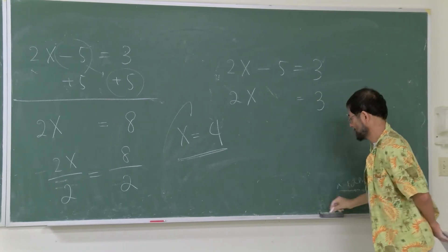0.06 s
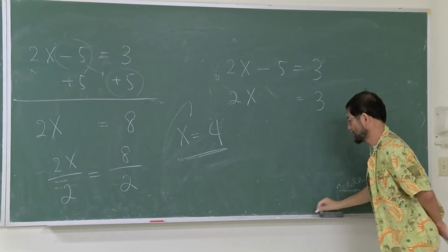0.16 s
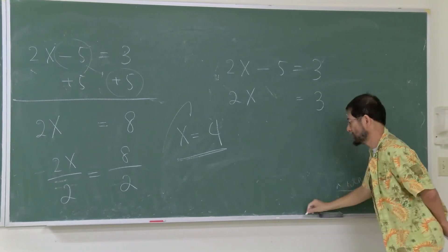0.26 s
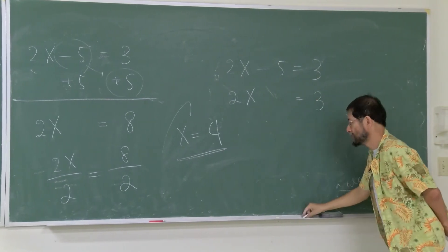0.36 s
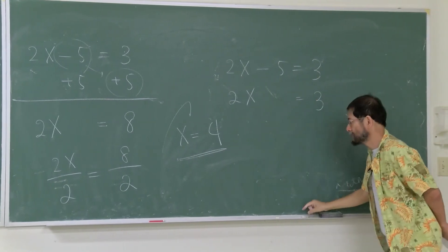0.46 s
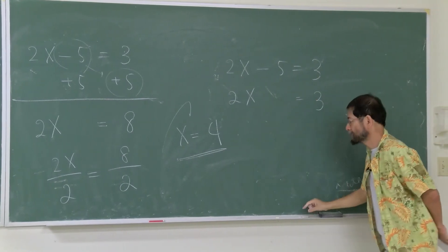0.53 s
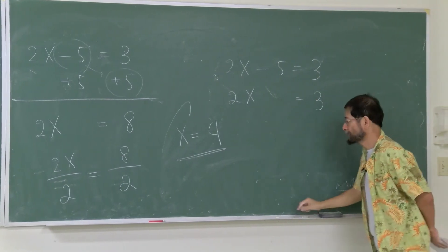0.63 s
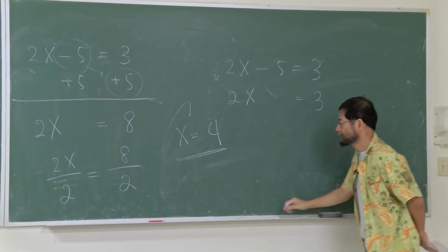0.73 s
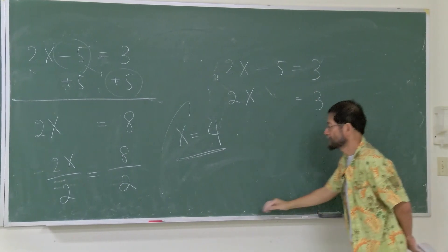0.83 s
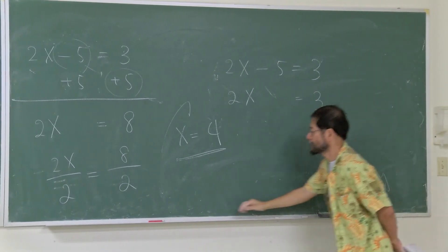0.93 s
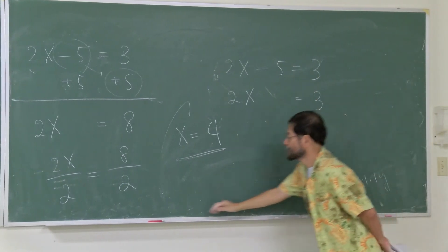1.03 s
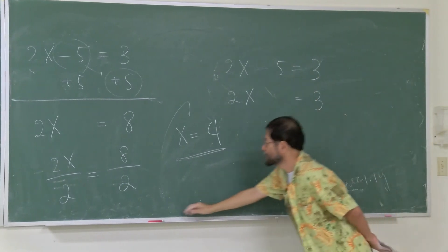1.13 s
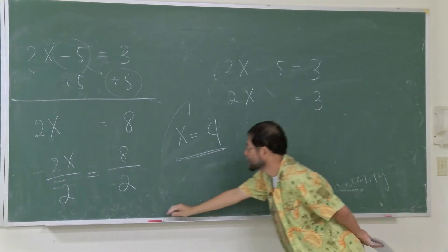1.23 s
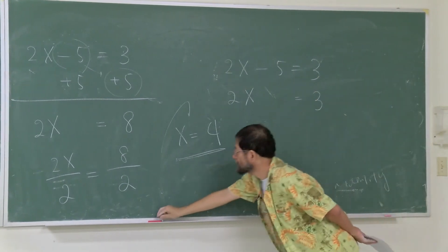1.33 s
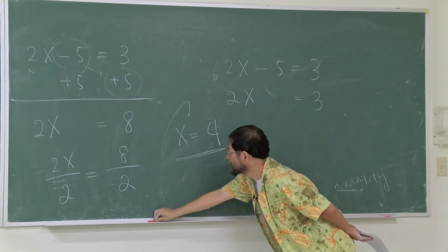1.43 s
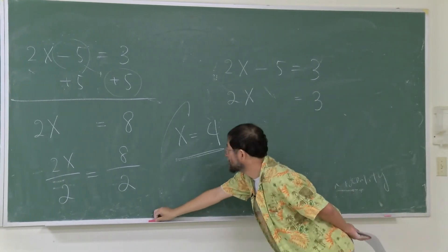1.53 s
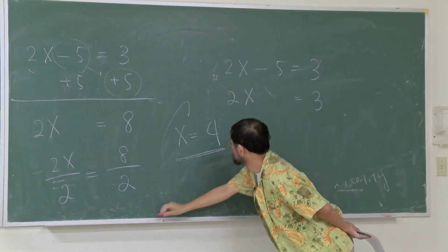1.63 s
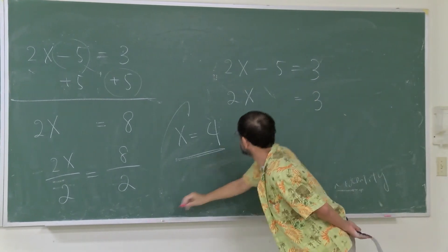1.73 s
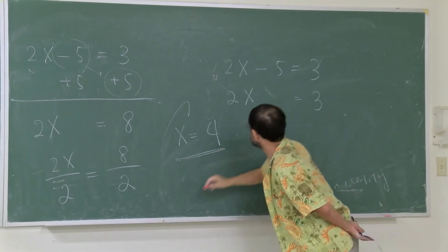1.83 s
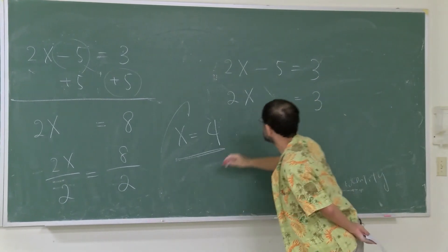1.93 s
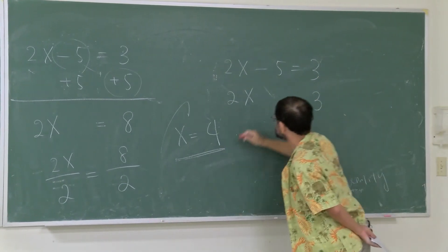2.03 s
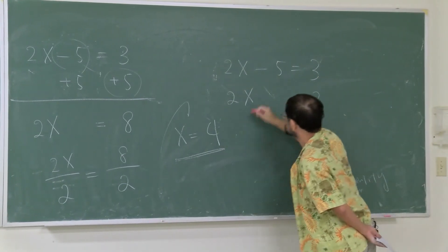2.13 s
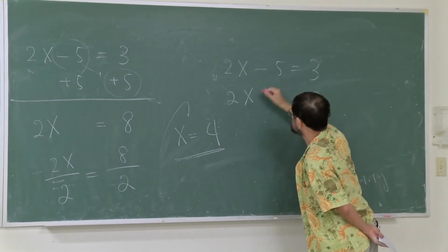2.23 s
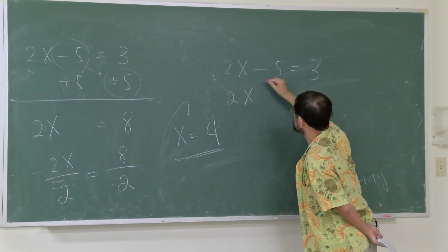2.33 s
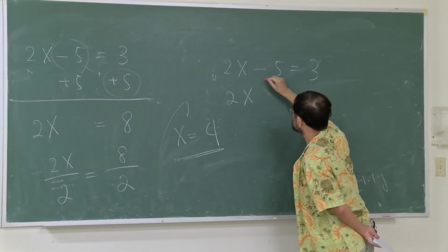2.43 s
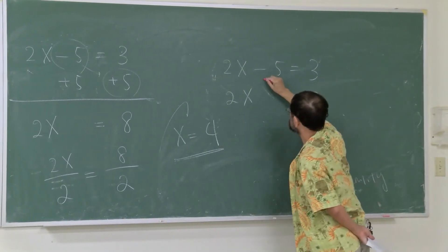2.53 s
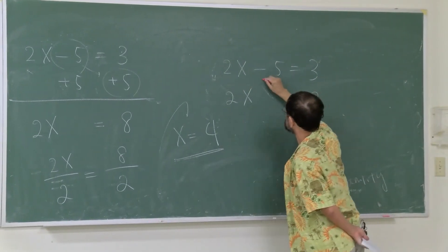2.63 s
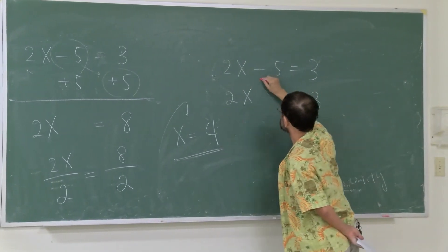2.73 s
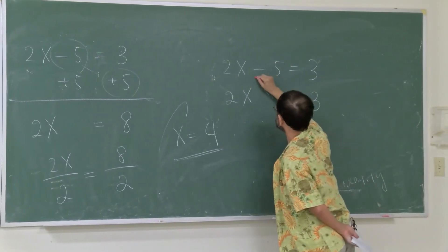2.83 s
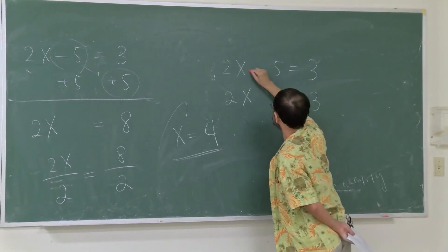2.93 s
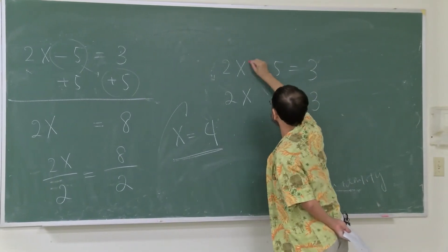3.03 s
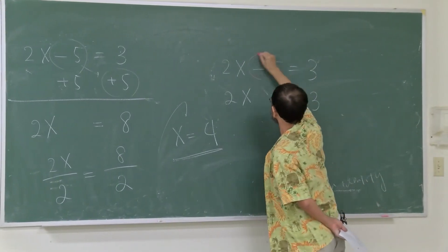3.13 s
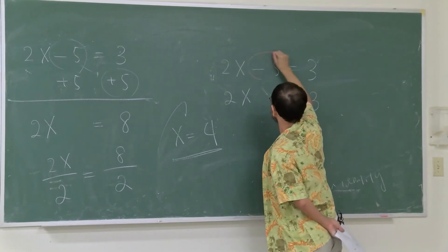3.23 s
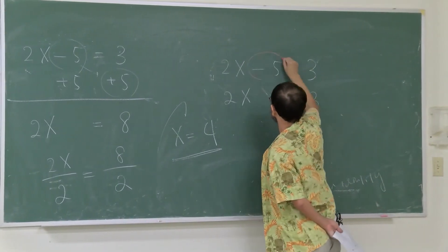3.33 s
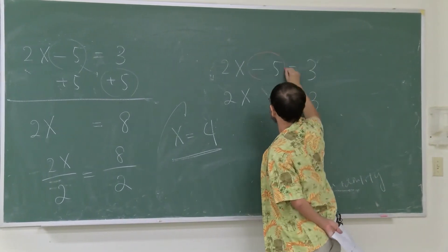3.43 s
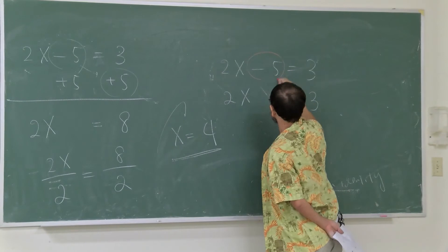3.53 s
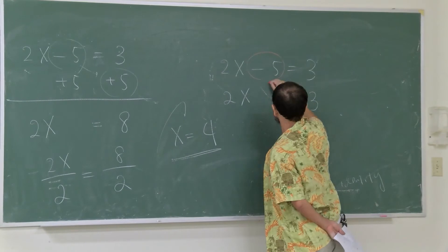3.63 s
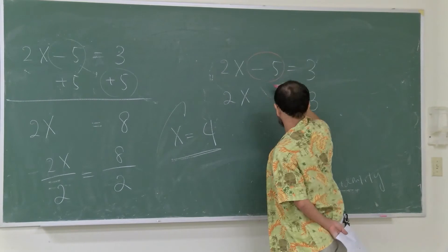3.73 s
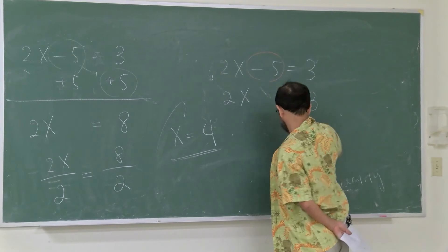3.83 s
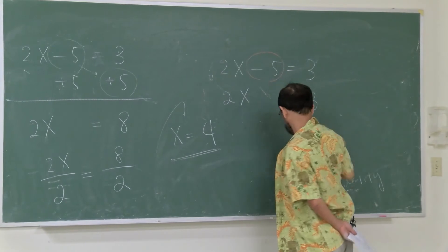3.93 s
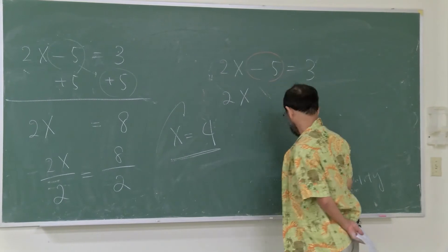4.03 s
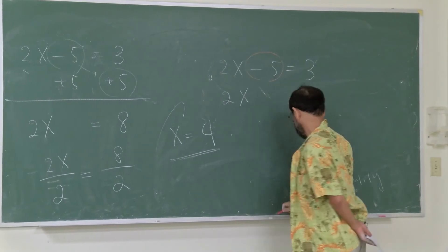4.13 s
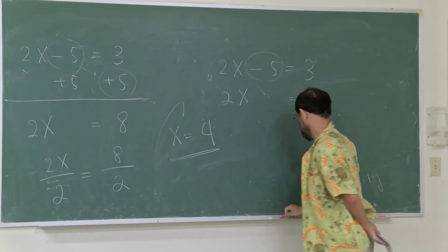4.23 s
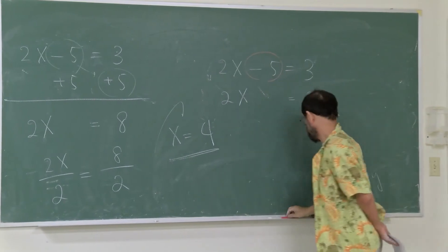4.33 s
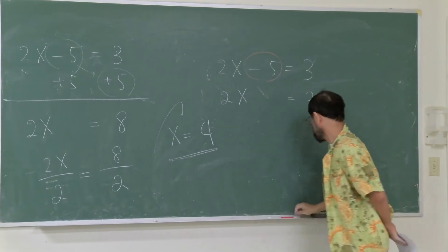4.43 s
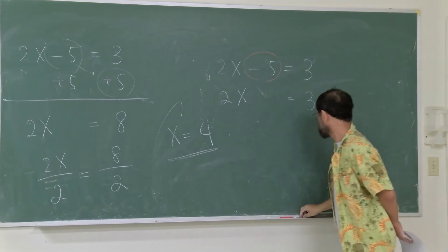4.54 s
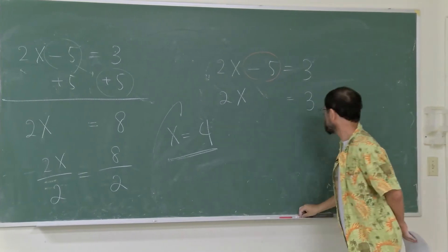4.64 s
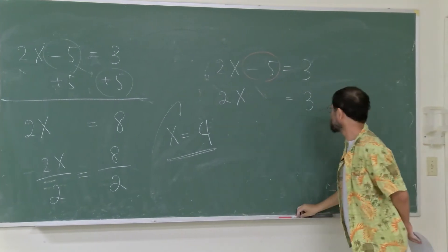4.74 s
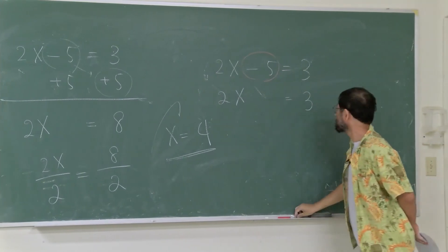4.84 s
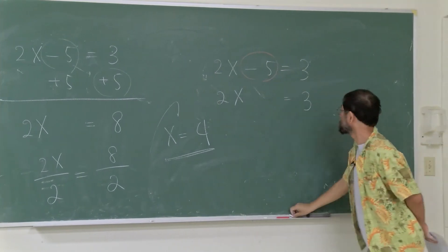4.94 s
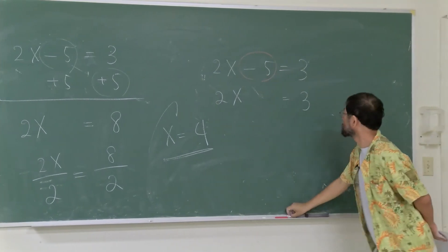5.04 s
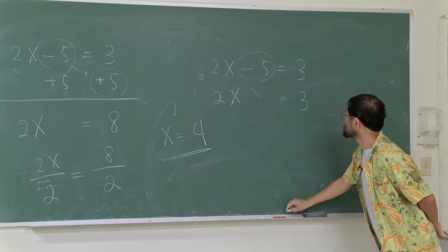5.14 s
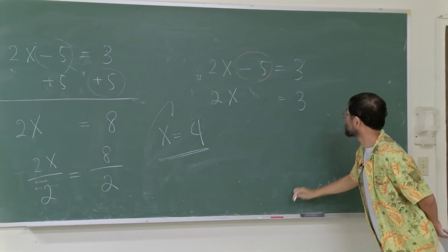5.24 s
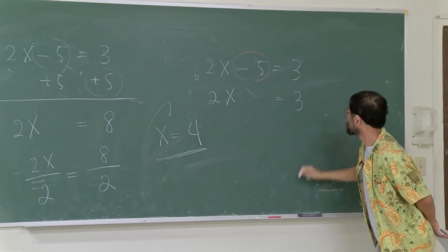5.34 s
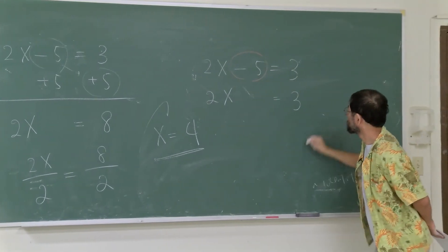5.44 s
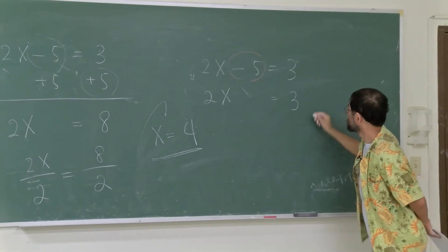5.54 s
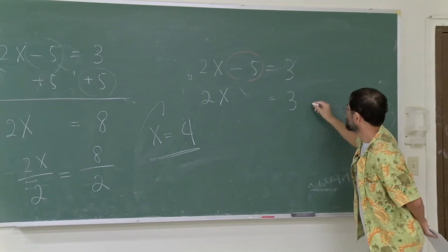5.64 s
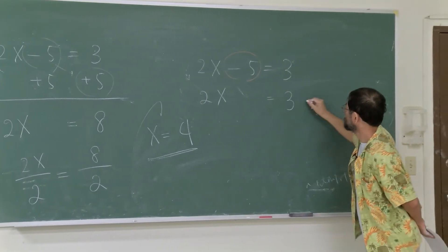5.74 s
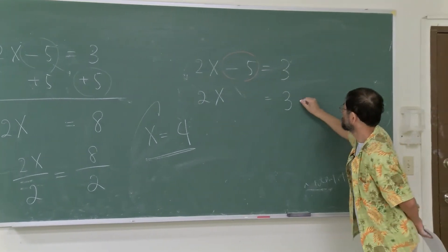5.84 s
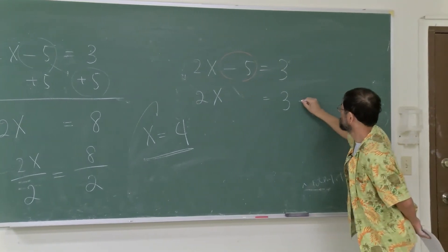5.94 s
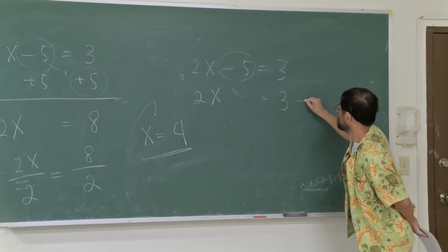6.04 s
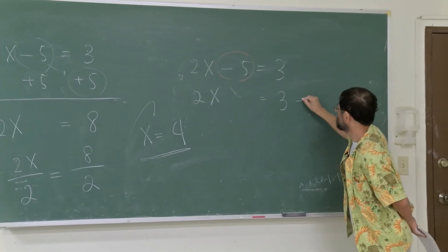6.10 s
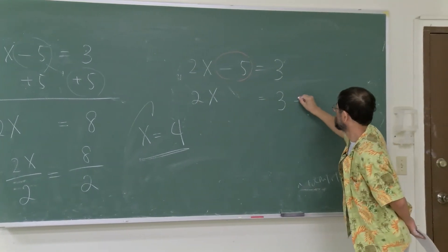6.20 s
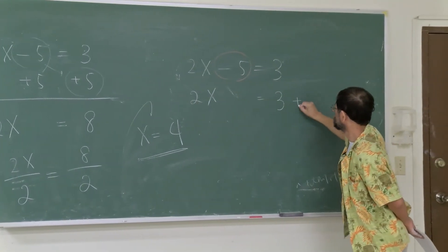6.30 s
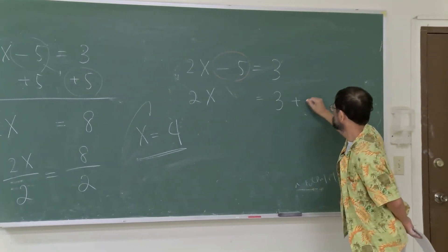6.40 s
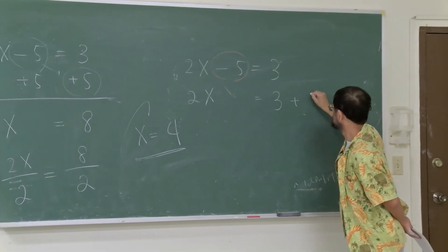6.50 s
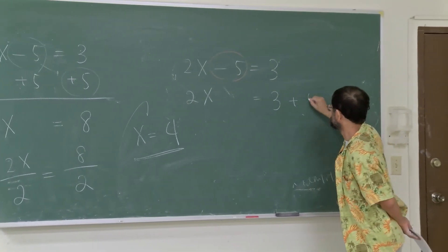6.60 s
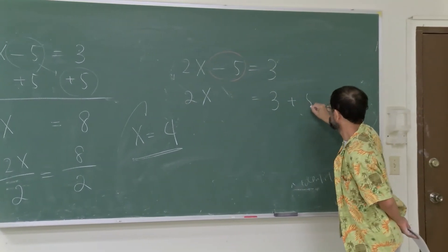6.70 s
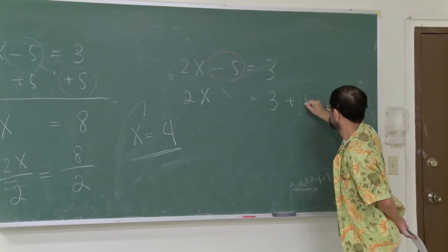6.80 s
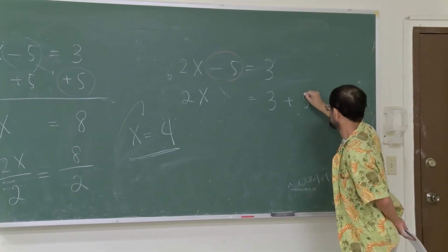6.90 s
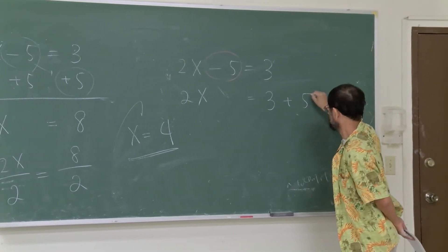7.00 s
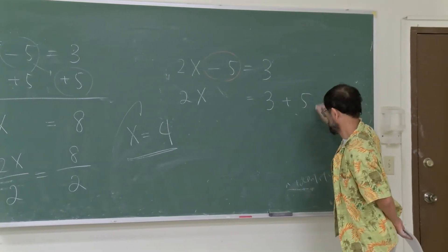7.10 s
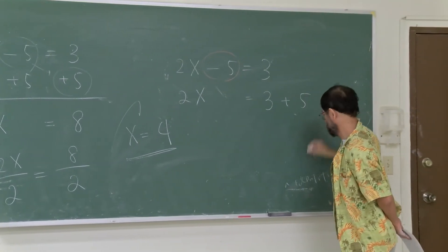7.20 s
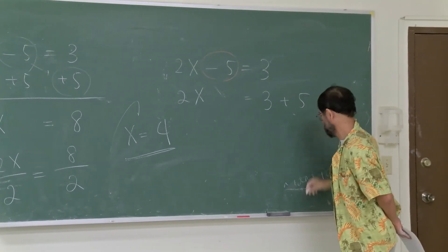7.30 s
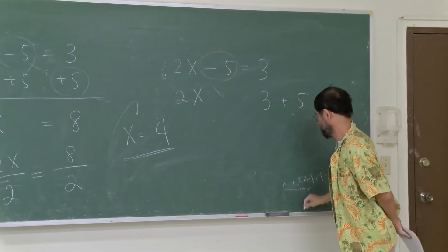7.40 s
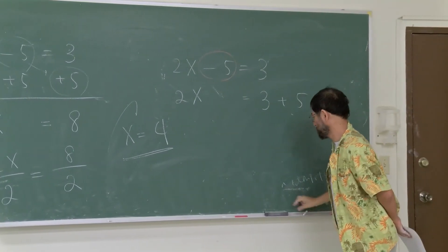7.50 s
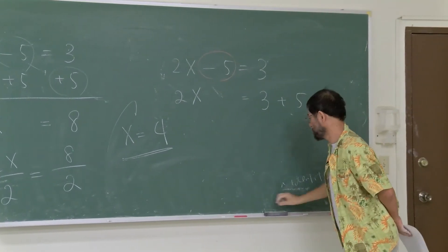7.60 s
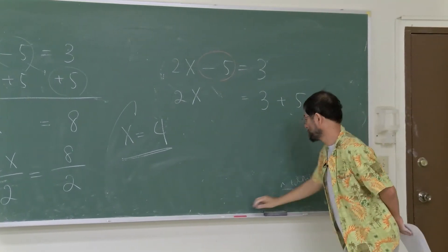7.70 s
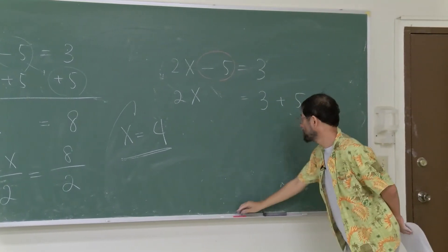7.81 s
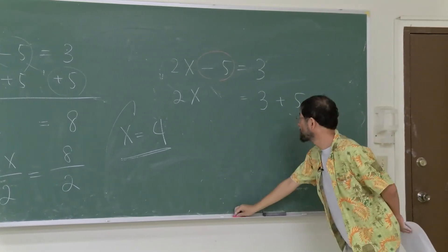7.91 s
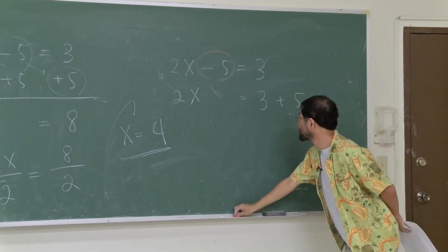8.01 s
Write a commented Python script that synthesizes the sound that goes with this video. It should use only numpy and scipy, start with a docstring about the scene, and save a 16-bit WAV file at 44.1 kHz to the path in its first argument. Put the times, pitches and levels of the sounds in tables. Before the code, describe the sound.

A bare, lively classroom heard from a few metres away, with a low steady ventilation rumble. Chalk knocks and clinks sharply in a metal tray, followed by soft shuffling and a few taps on a blackboard. A dry hiss sweeps round for about a second and ends in a tiny squeak. The tray rattles again, several crisp taps and faint short strokes follow, then the hardest metallic knocks and one faint last touch.

```python
"""A wall blackboard in a bare, ringing classroom, heard from a few metres over a low ventilation rumble.
Chalk sticks knock and clink in the metal tray (decaying modes, plate waves), then a few taps hit the panel.
The chalk hisses round in a circle (noise that follows the hand's speed), squeaks, and the tray knocks again.
Taps and short strokes write a plus sign and a digit; then come the hardest knocks and a last faint one.
Shoes and clothes shuffle now and then, as swells of noise; the room adds reflections and a tail."""
import sys
import numpy as np
from scipy import signal
from scipy.fft import rfft, irfft, next_fast_len
from scipy.io import wavfile

SR = 44100
rng = np.random.default_rng(int(sys.argv[2]) if len(sys.argv) > 2 else 0)


def int16_out(signal):
    """Quantize to a 16-bit WAV file."""
    q = np.round(np.clip(np.atleast_2d(signal).T, -1, 1) * 32767)
    wavfile.write(sys.argv[1], SR, q.astype(np.int16))


N = 355446
TIME = np.arange(N) / SR
AGE = np.arange(2 ** 15) / SR   # seconds since a blow

# colour of the short tick and of the echoes in the panel: f/Hz, relative level/dB
TICK_SPECTRUM = [(200, -2), (1000, 4), (5000, -1.5), (10000, -6), (16000, -10)]
# colour of chalk drawn over the panel: f/Hz, relative level/dB
HISS_SPECTRUM = [(1500, -1.5), (3500, -12), (5000, -2.5), (7000, -2.5), (10500, -6.5), (12500, -13),
                 (16000, -26)]

# thuds of board and panel grow by this many dB per dB of force, counted from a firm blow
THUD_FOLLOWS, FIRM_BLOW_DB = 0.66, -30.0
HISS_POWER = 0.56   # the hiss follows this power of the hand's speed


def from_db(db):
    """Turn decibels into an amplitude factor."""
    return 10 ** (np.asarray(db) / 20)


def rms_one(x):
    """Scale a signal to an rms of 1."""
    return x / np.sqrt(np.mean(x ** 2) + 1e-20)


def blow(x, db):
    """Scale a transient to the energy of 5 ms of sound at this level."""
    return from_db(db) * x * np.sqrt(.005 * SR / np.sum(x ** 2))


def at_hz(points, hz):
    """Read a table on a log-frequency axis."""
    freqs, values = np.transpose(points)
    return np.interp(np.log(np.maximum(hz, 1)), np.log(freqs), values)


def add(track, s, sound):
    """Mix a sound in at a time."""
    start = round(s * SR)
    track[start:start + len(sound)] += sound[:N - start]


def lowpass(x, hz):
    """Dull a sound above a frequency, at 12 dB per octave."""
    return signal.sosfilt(signal.butter(2, min(hz, .45 * SR), fs=SR, output="sos"), x + 1e-18)


def coloured(x, spectrum):
    """Give a signal a smooth spectrum; rms 1."""
    size = next_fast_len(len(x), True)
    gain = from_db(at_hz(spectrum, np.fft.rfftfreq(size, 1 / SR)))
    return rms_one(irfft(rfft(x, size) * gain, size)[:len(x)])


def drift(rate):
    """Smooth chance with spread 1, drawn anew at this many points a second."""
    knots = rng.standard_normal(int(rate * N / SR) + 2)
    return rms_one(np.interp(TIME * rate, np.arange(len(knots)), knots))


def ring(modes, scatter_db):
    """Decaying sines; every blow shares its strength among the modes a little differently."""
    hz, db, t60 = np.transpose(modes)[:, :, None]
    sign = (-1) ** np.arange(len(modes))[:, None]   # neighbouring modes swing in opposite directions
    strength_db = db + scatter_db * rng.standard_normal(db.shape)
    envelope = from_db(strength_db - 60 * AGE / t60)
    return np.sum(sign * envelope * np.sin(2 * np.pi * hz * AGE), axis=0)


def wavering_tone(hz, width_hz):
    """A resonance driven by friction: a narrow band of noise that follows a pitch."""
    phase = 2 * np.pi * np.cumsum(hz) / SR
    return rms_one(drift(width_hz) * np.cos(phase) + drift(width_hz) * np.sin(phase))


def click(spectrum, travel):
    """A click after travelling through a plate: treble outruns bass, so it falls like a chirp."""
    hz = np.fft.rfftfreq(len(AGE), 1 / SR)
    # speed goes with the root of frequency; travel is the delay at 6 kHz, in seconds
    phase = 4 * np.pi * abs(travel) * np.sqrt(6000 * hz)
    return irfft(from_db(at_hz(spectrum, hz)) * np.exp(-1j * phase)) * (AGE < .2)


def edge_echoes(spectrum, delay, t60):
    """The wave, thrown back and forth between the edges, blurs into a short burst."""
    return coloured(rng.standard_normal(len(AGE)), spectrum) * (AGE > delay) * from_db(-60 * AGE / t60)


def swell(s, db, length_s):
    """Gain of a movement that grows to its height at a time and dies away again."""
    depth_db, rise = 16.5, 0.57   # how far it rises and falls within its length; share spent rising
    away = np.maximum((s - TIME) / rise, (TIME - s) / (1 - rise)) / length_s
    return from_db(db - depth_db * np.minimum(away, 10))


def sweep_speed(start_s, length_s):
    """Speed of the hand along a stroke, 0 to 1: a quarter sine up, a quarter sine down."""
    fastest_at = 0.6   # share of the way through
    marks = start_s + length_s * np.array([0, fastest_at, 1])
    return np.abs(np.sin(np.interp(TIME, marks, [0, np.pi / 2, np.pi])))


def classroom(x, build_s=0.012):
    """Sparse early reflections thicken into a dense tail, which fades soonest in deep bass and top treble."""
    # decay of the room: f/Hz, t60/s
    decay = [(100, 0.53), (500, 1.03), (1400, 0.79), (3700, 0.96), (6500, 0.85), (10000, 0.69),
             (15000, 0.56)]
    # colour of the room: f/Hz, relative level/dB
    colour = [(100, 3), (500, -11.5), (1400, -6.5), (3000, -4), (6000, -2.5), (9000, -3.5), (15000, -16.5)]
    age = np.arange(int(1.2 * SR)) / SR
    density = .2 + (age / (2 * build_s)) ** 2
    spread = rms_one(rng.standard_normal(len(age)) * (rng.random(len(age)) < density))
    spectrum, hz = rfft(spread), np.fft.rfftfreq(len(age), 1 / SR)
    # twelve overlapping bands, each with its own level and decay
    centres, tail = np.geomspace(60, 16000, num=12), 0
    for centre, pick in zip(centres, np.eye(len(centres))):
        band = irfft(spectrum * at_hz(np.c_[centres, pick], hz), len(age))
        tail = tail + band * from_db(at_hz(colour, centre) - 60 * age / at_hz(decay, centre))
    # the first reflection comes after 4 ms
    return signal.fftconvolve(x, tail * (age > .004) * np.sqrt(18 / SR))[:N]


def ventilation(level_db=-56):
    """A steady rumble of moving air: noise that is strongest in the bass."""
    # colour of the air: f/Hz, relative level/dB
    air_spectrum = [(13, -49), (22, -15), (59, -4), (140, -12.5), (174, -12.5), (328, -18.5), (376, -20.5),
                    (409, -17), (690, -25), (815, -21.5), (910, -26), (988, -26.5), (1620, -30),
                    (1810, -32.5), (11000, -48.5), (16000, -65)]
    return from_db(level_db) * coloured(rng.standard_normal(N), air_spectrum)


def shuffle(gain_db=1.5, clump_db=1.5, grain_db=1.5):
    """Soles and cloth rub in uneven clumps of grains."""
    # steps and turns of the body, and at 5.975 s and 6.764 s a low rustle under the chalk strokes: t/s at the
    # height, level/dB ahead of gain_db, length/s
    moves = [(0.005, -57.5, 0.18), (0.337, -61.5, 0.66), (1.185, -55, 0.67), (1.74, -60, 0.33),
             (1.937, -50, 0.12), (2.069, -54.5, 0.45), (2.373, -52.5, 0.21), (3.83, -57, 0.16),
             (3.939, -47, 0.18), (4.172, -53.5, 0.72), (5.425, -54.5, 0.26), (5.622, -63, 0.17),
             (5.975, -58, 0.23), (6.764, -67, 0.35), (7.285, -55, 0.38)]
    # colour of soles and cloth: f/Hz, relative level/dB
    cloth_spectrum = [(71, -18), (120, 3), (334, -3.5), (378, -2), (436, -1.5), (684, -3), (822, -7.5),
                      (1460, -11.5), (1720, -13.5), (2150, -12), (3590, -22), (8840, -26), (16000, -43)]
    grains = rng.standard_normal(N) * from_db(clump_db * drift(60) + grain_db * drift(700))
    gain = from_db(gain_db) * sum(swell(*move) for move in moves)
    return gain * coloured(grains, cloth_spectrum)


def clink(hz, width_hz, t60=0.028):
    """One stick chatters against another for a few ms and rings at its own pitch."""
    radius = np.exp(-np.pi * width_hz / SR)
    chatter = rng.standard_normal(len(AGE)) * from_db(-60 * np.minimum(AGE / t60, 4))
    resonator = [1, -2 * radius * np.cos(2 * np.pi * hz / SR), radius * radius]
    return signal.lfilter([1, 0, -1], resonator, lowpass(chatter, 1.7 * hz))


def chalk_clinks(room_db=0.5):
    """Chalk sticks strike each other in the tray and ring briefly. Gives (direct, into the room)."""
    # sticks clinking together: t/s, level/dB, f/Hz, width/Hz
    clink_table = [(0.474, -30.5, 5170, 2800), (1.5314, -40, 4500, 2410), (1.576, -49, 5300, 500),
                   (4.2960, -30.5, 5550, 1100), (4.318, -37, 5300, 900), (4.356, -31.5, 6200, 1300),
                   (4.357, -44, 10000, 2000), (4.8, -33, 8090, 220), (4.802, -37.5, 10700, 2600),
                   (7.610, -26.5, 5550, 2000)]
    direct = np.zeros(N)
    for s, db, pitch_hz, width_hz in clink_table:
        add(direct, s, blow(clink(pitch_hz, width_hz), db))
    return direct, from_db(room_db) * direct


def tray_knocks(ring_room_db=1.0, room_db=-1.0, echo_db=0.0, tick_db=-16.0, rocking_db=-44.5):
    """A knock rings the tray; its bending wave radiates from the rail ms later. Gives (direct, into the room)."""
    # knocks: t/s, ring level/dB, contact f/Hz, boost of hollow modes/dB, bending wave level/dB,
    # top f/Hz of tick and wave, travel time of the wave/s
    knocks = [(0.3919, -25.5, 1820, 4.5, -35, 5500, 0.0073), (0.4196, -38, 1900, -9, -42, 5500, 0.0047),
              (0.4495, -36.5, 1700, 1, -53, 5000, 0.006), (0.468, -24.5, 2050, 1, -25, 7550, 0.0059),
              (0.5300, -39.5, 800, 28, -41.5, 2000, 0.0033), (1.5319, -42.5, 2000, 9, -40.5, 7300, .0044),
              (4.291, -27, 2770, 7.5, -27.5, 8350, 0.0052), (4.3507, -29, 2220, 9, -31.5, 8500, 0.0048),
              (4.5510, -45, 990, 15, -55, 3000, 0.0034), (4.5923, -42.5, 3500, 22, -50, 4470, 0.0061),
              (4.6346, -41.5, 540, 20, -58, 2000, 0.0092), (4.6813, -33.5, 1600, 4, -44.5, 3940, 0.0066),
              (4.7135, -43, 1900, 5, -52, 4000, 0.0068), (4.7993, -27.5, 6000, 15.5, -32, 9300, 0.0037),
              (4.8685, -41.5, 1390, 25, -42.5, 1200, 0.0008), (5.0019, -35.5, 2070, 6.5, -39, 4730, 0.004),
              (7.5354, -22, 2000, 2, -27, 4600, 0.0066), (7.5404, -20, 1150, -13, -38, 3000, 0.0088),
              (7.6040, -27.5, 5030, -6, -21, 8700, 0.0056), (7.9750, -52.5, 4000, 24, -51, 10400, 0.0068)]
    # modes of the metal tray: f/Hz, relative level/dB, t60/s
    tray_modes = [(570, -18.5, 0.023), (734.5, -16.5, 0.088), (830, -30, 0.046), (994, -19, 0.02),
                  (1234, -19, 0.023), (1547, -1.5, 0.054), (1648, -6.5, 0.046), (1710, 4.5, 0.024),
                  (1745, 5.5, 0.0097), (2290, -16.5, 0.29), (2500, -16, 0.14), (2905, -22, 0.68),
                  (2980, -36, .4), (3770, 4, 0.027), (3930, -22, 0.206), (4830, -18, .2),
                  (5180, -12.5, 0.022), (5230, -10, 0.23), (5480, -25, .2), (6560, -23, 0.13)]
    # the whole board rocking on the wall after a knock: f/Hz, relative level/dB, t60/s
    rocking_modes = [(26.8, 4, 0.13), (41.1, -2, 0.067), (55.6, -8, 0.17), (79.5, -5.5, 0.061),
                     (119, -2, 0.051), (198, -13, 0.055), (287, -7, 0.068), (494, -10, 0.044)]
    # colours of the wave's first arrival, its echoes and the loose chalk's chatter: f/Hz, relative level/dB
    chirp_spectrum = [(500, -32), (1700, -0.5), (3000, -4), (5800, 1), (7200, -0.5), (9000, -8),
                      (11000, -12), (13000, -34), (16000, -35)]
    bending_spectrum = [(200, -34), (600, 0), (1100, -2), (1700, 1), (3000, -3.5), (4200, -2.5),
                        (5800, -0.5), (7200, -5.5), (9000, -6), (11000, -19.5), (13000, -36),
                        (16000, -32.5)]
    chatter_spectrum = [(20, 0), (220, 0), (700, -40)]
    direct, sent = np.zeros((2, N))
    # the boost touches only the level of modes below 1300 Hz
    hollow = np.outer(np.array(tray_modes)[:, 0] < 1300, [0, 1, 0])
    for s, ring_db, contact_hz, hollow_db, wave_db, top_hz, travel in knocks:
        ringing = ring(tray_modes + hollow_db * hollow, scatter_db=2.5)
        body = blow(lowpass(ringing, contact_hz), ring_db)
        tick = blow(lowpass(edge_echoes(TICK_SPECTRUM, delay=0, t60=0.017), top_hz), ring_db + tick_db)
        chirp = blow(lowpass(click(chirp_spectrum, travel), top_hz), wave_db)
        burst = edge_echoes(bending_spectrum, delay=travel, t60=.07)
        echoes = blow(lowpass(burst, top_hz), wave_db + echo_db)
        thud_db = rocking_db + THUD_FOLLOWS * (ring_db - FIRM_BLOW_DB)
        thud = blow(ring(rocking_modes, scatter_db=1.5), thud_db)
        add(direct, s, body + tick + chirp + echoes + thud)
        # loose chalk chatters on the rail and roughens the ring that fills the room
        rough = .5 + coloured(rng.standard_normal(len(AGE)), chatter_spectrum)
        room_body = blow(body * rough, ring_db + ring_room_db)
        add(sent, s, from_db(room_db) * (room_body + chirp + echoes + thud))
    return direct, sent


def panel_taps(knock_room_db=-5.5, crack_direct_db=-11.0, echo_db=-8.0, firm_thud_db=-35.5):
    """The tip lands: a short knock, a crack through the panel and a low thud. Gives (direct, into the room)."""
    # taps: t/s, knock level/dB, knock f/Hz, crack level/dB, crack top f/Hz, share for the room/dB
    # (both levels are ahead of the gains for the direct sound and the room)
    tap_table = [(1.0900, -50, 745, -47, 2470, 2.5), (1.9058, -41, 563, -40, 2700, -13),
                 (2.242, -56.5, 2000, -50, 3000, -6), (2.6591, -40.5, 1550, -48, 4000, -5),
                 (2.6634, -40.5, 715, -47.5, 1190, 5.5), (2.6692, -39.5, 1080, -56.5, 1800, 8.5),
                 (3.159, -41.5, 298, -53, 1000, -5), (3.7668, -60, 1440, -52, 5500, -14),
                 (3.802, -59, 900, -59, 4000, -10), (5.7255, -50, 464, -50, 3500, -19),
                 (5.8811, -46, 1500, -36.5, 2950, -8), (6.2300, -50, 1880, -31.5, 7160, -0.5),
                 (6.5646, -31.5, 1960, -33, 5100, -0.5), (6.9631, -29, 1990, -29, 4950, -0.5),
                 (7.2490, -53, 480, -51, 4000, -7.5), (7.3050, -55, 442, -61, 3000, -11)]
    # low modes of the panel: f/Hz, relative level/dB, t60/s
    panel_modes = [(27, -6, 0.063), (41, -9, 0.19), (60.5, 0.5, 0.14), (82.3, -6, 0.35), (109, -2, 0.14),
                   (142.2, -2.5, 0.2), (186.8, -0.5, 0.053), (250, -2.5, 0.067), (300, -5, 0.055),
                   (447, -5.5, 0.06)]
    # colour of the crack: f/Hz, relative level/dB
    crack_spectrum = [(200, 0.5), (600, 4.5), (1100, -4.5), (2100, 4.5), (3200, 0.5), (5000, 0.5),
                      (7000, -4.5), (10000, -14.5), (16000, -8)]
    direct, sent = np.zeros((2, N))
    for s, knock_db, knock_hz, crack_db, top_hz, room_db in tap_table:
        # the knock swells for about half a cycle as the panel takes up the blow, and lasts some six cycles
        envelope = np.sqrt(AGE) * from_db(-60 * AGE * knock_hz / 6.0)
        knock = blow(envelope * np.sin(2 * np.pi * knock_hz * AGE), knock_db)
        crack = blow(lowpass(click(crack_spectrum, travel=0.000283), top_hz), crack_db)
        burst = edge_echoes(TICK_SPECTRUM, delay=0.001, t60=0.031)
        echoes = blow(lowpass(burst, top_hz), crack_db + echo_db)
        thud_db = firm_thud_db + THUD_FOLLOWS * (max(knock_db, crack_db) - FIRM_BLOW_DB)
        thud = blow(ring(panel_modes, scatter_db=7.0), thud_db)
        add(direct, s, thud - knock + echoes + from_db(crack_direct_db) * crack)
        # the panel throws its treble sideways, so the direct crack is held back
        add(sent, s, from_db(room_db) * (crack + from_db(knock_room_db) * (knock + thud)))
    return direct, sent


def strokes():
    """After a tap the chalk is drawn over the panel, its hiss growing with its speed."""
    # short strokes of a plus sign and a digit: t/s at the start, length/s, level/dB at full speed
    stroke_table = [(5.92, 0.19, -75), (6.25, 0.16, -74), (6.613, 0.3, -74.5), (6.99, 0.19, -70)]
    gain = sum(from_db(db) * sweep_speed(s, length_s) ** HISS_POWER for s, length_s, db in stroke_table)
    return gain * coloured(rng.standard_normal(N), HISS_SPECTRUM)


def circle(hiss_db=-62.5, friction_db=-11.5, pitch_power=4.0):
    """Hiss and friction resonance follow the hand's speed, and the loop ends in a thin squeak."""
    # one sweep of the arm: t/s at the start, length/s
    arm_sweep = (2.713, 1.01)
    speed = sweep_speed(*arm_sweep)
    grip = from_db(1.2 * drift(35))   # the level wavers slightly
    hiss = coloured(rng.standard_normal(N), HISS_SPECTRUM)
    # the resonance sits at 8300 Hz at rest, rises by 1900 Hz at full speed and wanders about that
    friction_hz = 8300 + 1900 * speed ** pitch_power + 350 * drift(25)
    resonance = from_db(friction_db) * wavering_tone(friction_hz, width_hz=1100)
    # the chalk squeaks as it lifts, rising in pitch as the pressure goes
    squeak_s, squeak_db, squeak_length_s = 3.752, -60.5, 0.06
    squeak_hz, rise_hz_per_s = 11700, 21000
    glide = rise_hz_per_s * np.clip(TIME - squeak_s, -squeak_length_s, squeak_length_s)
    tone = wavering_tone(squeak_hz + glide, width_hz=350)
    squeak = swell(squeak_s, squeak_db, squeak_length_s) * tone
    return from_db(hiss_db) * speed ** HISS_POWER * grip * (hiss + resonance) + squeak


def scene(rub_room_db=-12.5, balance_db=-3.0):
    """Direct sounds, room and ventilation reach two channels alike, the second one 3 dB louder."""
    air = ventilation()
    rubbing = shuffle() + strokes() + circle()
    knock_direct, knock_sent = tray_knocks()
    clink_direct, clink_sent = chalk_clinks()
    tap_direct, tap_sent = panel_taps()
    room = classroom(knock_sent + clink_sent + tap_sent + from_db(rub_room_db) * rubbing)
    mix = knock_direct + clink_direct + tap_direct + rubbing + room + air
    return mix * from_db([[balance_db / 2], [-balance_db / 2]])


def record(dry):
    """The top is cut steeply above 15.9 kHz."""
    return signal.sosfilt(signal.ellip(10, .1, 80, 15900, fs=SR, output="sos"), dry)


dry = scene()
out = record(dry)
int16_out(out)
```